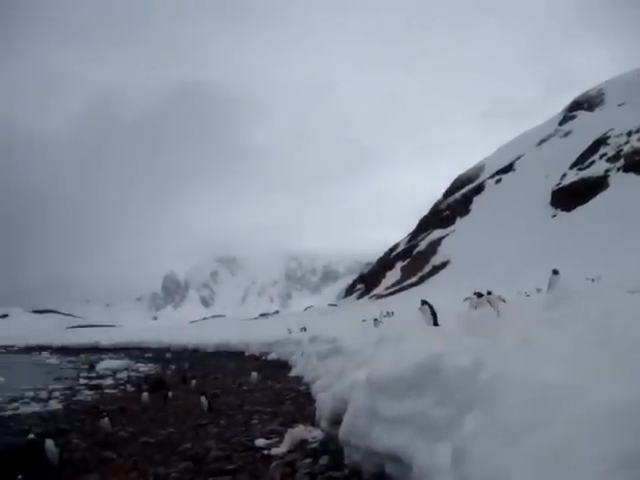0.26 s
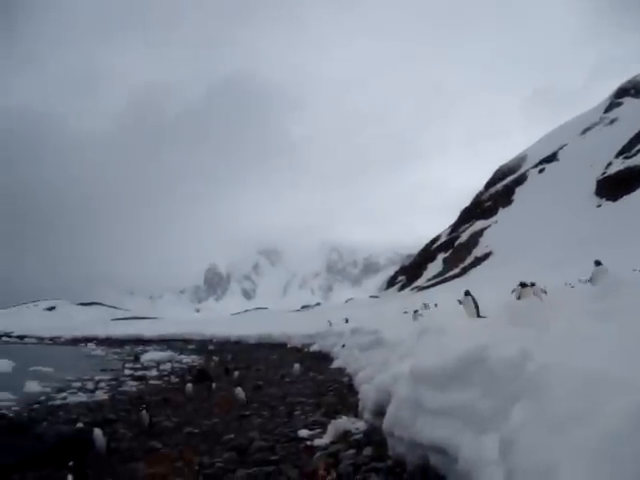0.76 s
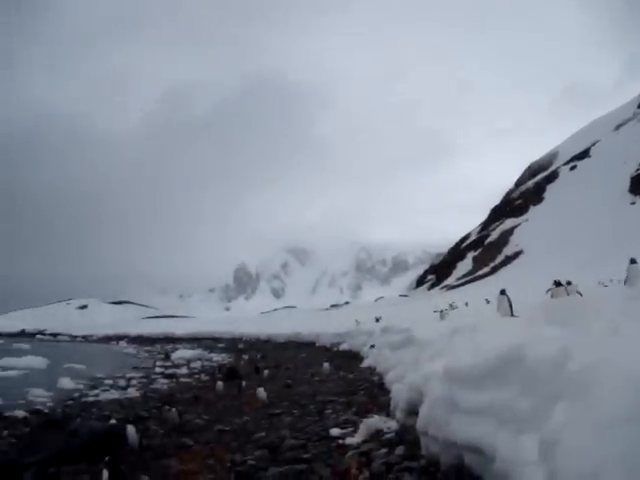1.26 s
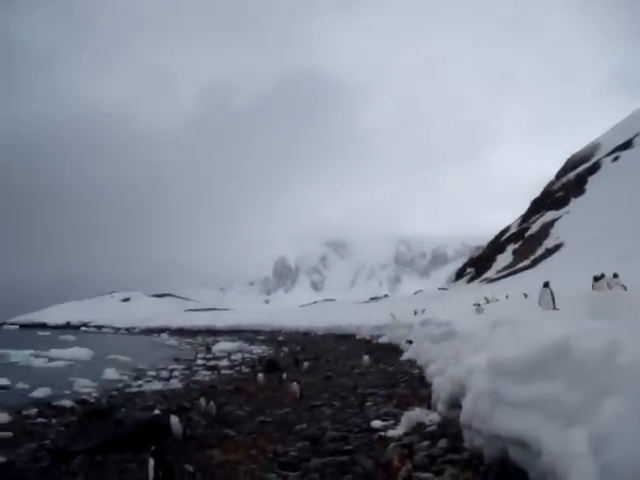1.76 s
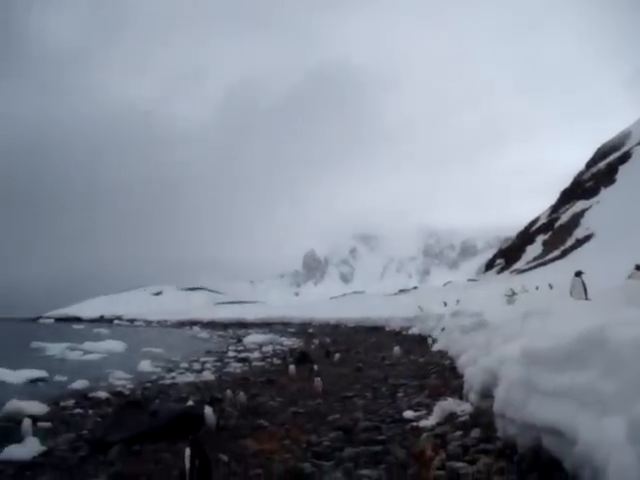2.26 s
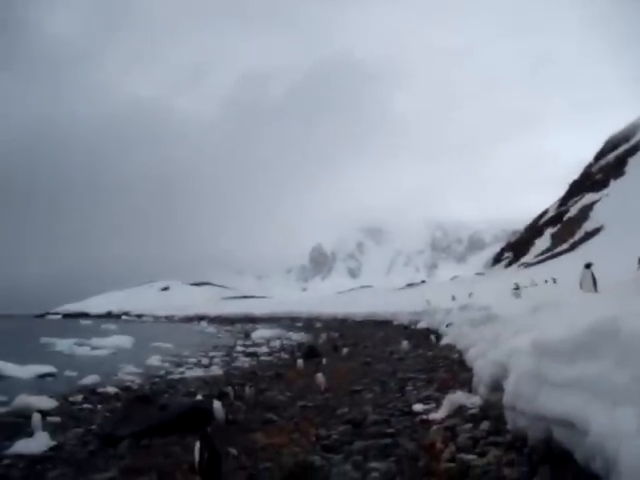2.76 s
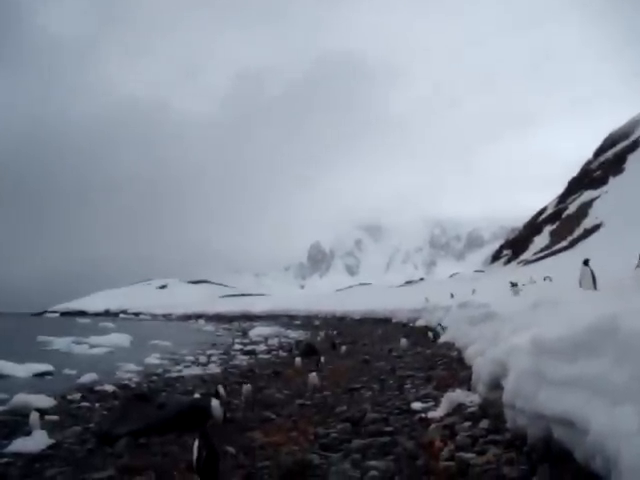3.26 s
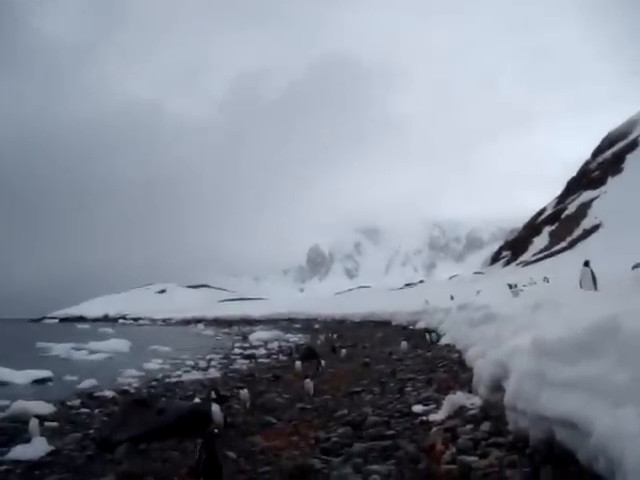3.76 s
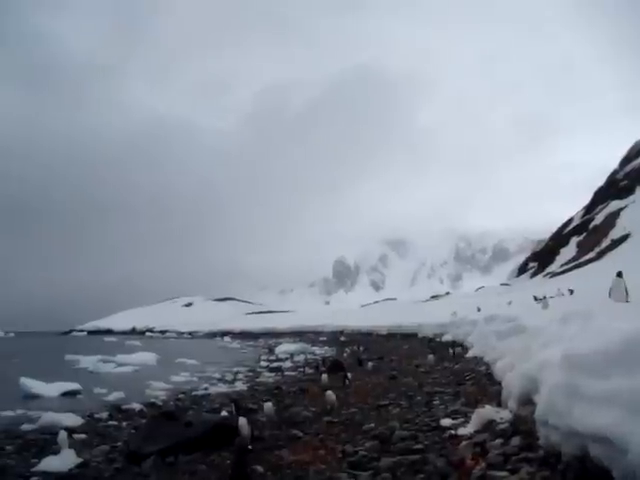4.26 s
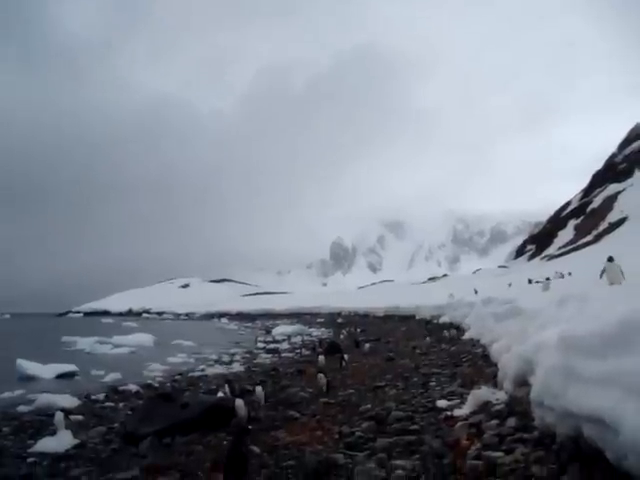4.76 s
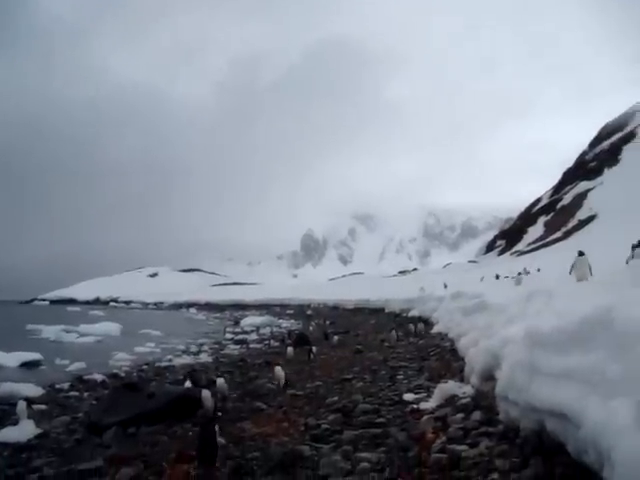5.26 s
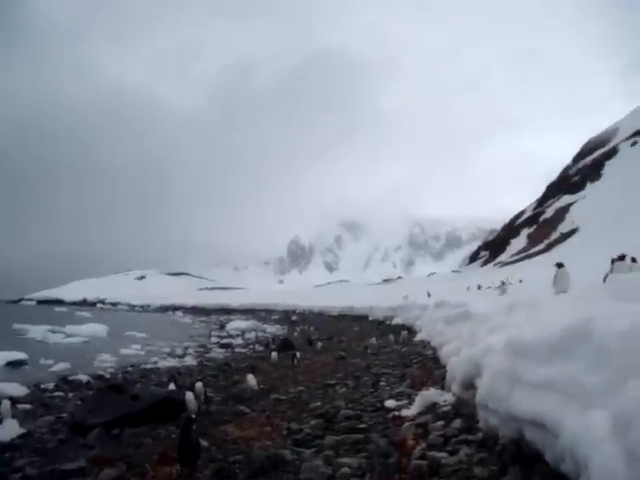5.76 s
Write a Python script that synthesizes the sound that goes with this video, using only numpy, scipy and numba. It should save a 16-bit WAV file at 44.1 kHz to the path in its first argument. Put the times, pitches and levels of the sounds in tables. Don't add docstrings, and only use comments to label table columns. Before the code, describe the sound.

On a windy pebble shore, far buzzy penguin brays and clear gasps give way to a slapping wavelet, then one loud close bray.

```python
import sys
import numpy as np
from scipy import signal
from scipy.io import wavfile
from scipy.ndimage import uniform_filter1d
from numba import njit

SR = 44100
rng = np.random.default_rng(int(sys.argv[2]) if len(sys.argv) > 2 else 0)


def unload_wav(signal):
    wavfile.write(
        sys.argv[1],
        SR,
        np.round(np.clip(np.atleast_2d(signal).T, -1, 1) * 32767).astype(np.int16),
    )


def natural_amplitude(level_db):
    exponent = np.asarray(level_db, float) / 20
    return 10 ** exponent


N = 264415
T = np.arange(N) / SR


def unit(x):
    return x / np.sqrt(np.mean(x ** 2) + 1e-30)


@njit
def svf(x, hz, width):
    y, b, l = np.empty(len(x)), 0., 0.
    g, k = np.tan(np.pi * hz / SR), width / hz
    for i in range(len(x)):
        v = (b + g * (x[i] - l)) / (1 + g * (g + k))
        b, l, y[i] = 2 * v - b, l + 2 * g * v, k * v
    return y


def ring_twice(x, hz, width):
    return svf(svf(x, float(hz), float(width)), float(hz), float(width))


def walk(rate):
    hold = int(SR / rate)
    steps = np.repeat(rng.standard_normal(N // hold + 1), hold)
    return unit(uniform_filter1d(uniform_filter1d(steps, hold), hold)[:N])


def fade(t0, t1, edge):
    return np.clip(np.minimum(T - t0, t1 - T) / edge, 0, 1)


def water(colour, tilt_db, swell_db, flicker_db, per_s, grain_db, spread_db):
    hz, db = np.transpose(colour)
    out, swell, shared = 0, swell_db * walk(20), 0
    for f in 25 * 2 ** (np.arange(27) / 3):
        shared = 0.87 * shared + 0.25 * flicker_db * walk(18)
        drop_size = natural_amplitude(spread_db * np.minimum(rng.exponential(size=N), 3))
        drops = (rng.random(N) < per_s / SR) * drop_size * rng.choice([-1, 1], N)
        mix = rng.standard_normal(N) + natural_amplitude(grain_db) * min(f / 2000, 1) * unit(drops)
        wobble = swell * min(f / 1000, 1) + shared
        wobble = wobble - uniform_filter1d(wobble, size=SR // 5)
        band = unit(ring_twice(mix, f, f / 3)) * np.sqrt(f)
        out = out + band * natural_amplitude(np.interp(np.log(f), np.log(hz), db) + tilt_db(f) + wobble)
    return out


# pitch in Hz, level in dB per Hz.
SHORE_COLOUR = [(15, -61), (25, -29.5), (250, -6.5), (363, -11.5), (646, -2.5), (1090, -3), (1240, -2.5),
                (1470, -4.5), (1990, -4), (2550, -9.5), (9860, -19.5), (12800, -7.5), (21700, -120)]
# time in seconds, level in dB.
SHORE_LEVEL = [(0, -40.5), (.5, -38), (1.5, -39.5), (2.3, -38), (6.0, -37)]


def shore():
    rush = water(SHORE_COLOUR, lambda f: 0, swell_db=1.1, flicker_db=1.1, per_s=250, grain_db=-7,
                 spread_db=2.5)
    return unit(rush) * natural_amplitude(np.interp(T, *np.transpose(SHORE_LEVEL)))


def knocks(rows):
    out, t = np.zeros(2 * N), T[:SR // 2]
    for start_s, db, hz, width_hz, t60_s, rise_s in rows:
        shape = (1 - np.exp(-t / rise_s)) * np.exp(-np.log(1000) * t / t60_s)
        tap = np.arange(len(t)) == int(rise_s * SR)
        contact = shape * (rng.standard_normal(len(t)) + 4 * tap)
        burst = ring_twice(contact, hz, 1.9 * width_hz)
        first = int(start_s * SR)
        out[first:first + len(t)] += natural_amplitude(db) * burst / np.abs(burst).max()
    return out[:N]


# start in seconds, peak level in dB, centre pitch in Hz, width in Hz,
# time to die away by 60 dB in seconds.
CLICKS = [
    (.5442, -21.5, 2300, 1700, .02),
    (.589, -29, 4600, 1500, .012),
    (1.553, -31, 3200, 900, .015),
    (.6915, -22, 2580, 200, .09),
    (.692, -20, 3350, 750, .075),
    (.692, -29, 4600, 1500, .04),
    (2.2608, -21, 780, 300, .04),
    (2.3426, -14, 3300, 3500, .004),
    (2.3426, -25, 7000, 4000, .003),
]
BUMPS = [(.15, -37, 240, 60, .2), (.815, -33, 1180, 100, 0.089), (1.0, -28.5, 1900, 900, .09),
         (1.52, -35.5, 750, 300, 0.027), (1.73, -31, 1500, 900, 0.073), (1.905, -31, 1800, 600, .09),
         (0.016, -30.5, 1180, 500, 0.06), (.89, -25, 5450, 4970, 0.0098), (1.17, -43, 70, 40, 0.18),
         (1.18, -35, 280, 150, 0.124), (1.476, -30.5, 1850, 120, 0.062), (2.298, -23, 925, 700, .1),
         (2.382, -33, 305, 150, 0.28), (2.318, -21.5, 1130, 920, 0.029), (2.925, -31, 2580, 400, 0.044),
         (3.41, -34, 330, 60, 0.16), (2.305, -29.5, 6000, 3000, .06), (4.32, -31.5, 387, 90, 0.2),
         (4.55, -30, 380, 90, .2), (4.692, -27.5, 313, 59.4, 0.076)]


def stones():
    clicks = [(*k, 1 / k[2]) for k in CLICKS]
    bumps = [(*k, 0.082 * k[4]) for k in BUMPS]
    return knocks(clicks + bumps)


@njit
def closures(hz, stretch, size):
    pulses, phase, p, k = np.zeros(len(hz) + 1), np.empty(len(hz)), 0., 0
    for i in range(len(hz)):
        step = hz[i] * stretch[k] / SR
        p += step
        if p >= 1:
            p, k = p - 1, k + 1
            pulses[i] += size[k] * p / step
            pulses[i + 1] += size[k] * (1 - p / step)
        phase[i] = p
    return pulses[:-1], phase


def beats(start, beat, slowing):
    k = np.arange(25)
    return start + beat * k + slowing * k ** 2 + .001 * rng.standard_normal(len(k))


def bray(curve, flutter, cycle, throat, jitter, shimmer_db, air_db, knee_hz, order, tone_db, under_db,
         lead, chest_db):
    s, hz, db = np.transpose(curve)
    rest_hz = np.interp(T, s, hz)
    age = T - s[0]
    turn = np.interp(T, flutter, np.arange(len(flutter))) % 1
    share, *columns = np.transpose(cycle)
    ratio, effort_db, tone_ratio, swing_db = (np.interp(turn, share, c) for c in columns)
    chance = rng.standard_normal((N // 50, 2)).T
    pulses, phase = closures(rest_hz * ratio, 1 + jitter * chance[0], natural_amplitude(shimmer_db * chance[1]))
    buzz = unit(pulses)
    air = unit(np.exp(-phase / 0.75) * rng.standard_normal(N))

    depth = np.clip(0.3985 + age / 0.35, 0, 1)
    tired_s = np.maximum(age - 0.58, 0)
    early_db = np.sqrt(depth) * np.interp((turn + lead) % 1, share, columns[1])
    mouth_hz, narrowest_hz, rasp_db = 2400, 115, 3
    voice = natural_amplitude(-13 + effort_db) * svf(buzz, 1900., 3500.)
    for f_hz, g_db in throat:
        mouth = knee_hz < f_hz < mouth_hz
        push_db = early_db if mouth else effort_db
        source = natural_amplitude(air_db + mouth * (rasp_db + push_db)) * air + buzz
        ring = svf(source, float(f_hz), float(np.clip(f_hz / 5.5, narrowest_hz, 350)))
        ring = svf(ring, float(f_hz), float(max(f_hz * min(f_hz / 2000, 1.5), narrowest_hz)))
        if 600 < f_hz < knee_hz:
            g_db = g_db + 0.97 * effort_db + (f_hz < 800) * 8 * np.exp(-np.abs(age) / .25)
        dull_db = (f_hz > mouth_hz) * -12.5 * tired_s
        mottle_db = .9 * walk(60)
        bright_db = push_db * np.clip((f_hz - knee_hz) / 1100, 0, 1.2)
        voice = voice + natural_amplitude(g_db + dull_db + mottle_db + bright_db) * ring
    voice = signal.sosfiltfilt(signal.butter(4, 5200, fs=SR, output="sos"), -voice)

    angle = 2 * np.pi * np.cumsum(rest_hz * tone_ratio ** depth * (1 + 0.005 * walk(60))) / SR
    tone = np.sin(order * angle) + natural_amplitude(under_db) * np.sin((order - 1) * angle)
    swing_db = swing_db * depth - 19 * tired_s * (.3 + 1.7 * turn)
    tone = fade(s[0] + .06, 9, .03) * tone * natural_amplitude(tone_db + swing_db + 1.5 * walk(50))

    chest_hz = rest_hz * 1.035 * ratio ** .12 * .993
    chest = natural_amplitude(chest_db + 1.5 * walk(40)) * np.sin(2 * np.pi * np.cumsum(chest_hz) / SR)
    voice = unit(voice) + chest + tone
    return voice * natural_amplitude(np.interp(T, s, db)) * fade(s[0], s[-1] + 0.019, 0.011)


def far_breath(s, length, db, hz):
    attack_s, release_s, edge_db, sag_hz = 0.0897, 0.093, -15.5, 4.94
    return [(s, hz, db + edge_db),
            (s + attack_s, hz, db),
            (s + length - release_s, hz - sag_hz, db - 4),
            (s + length, hz - sag_hz - 9.4, db + edge_db)]


# start in seconds, length in seconds, level in dB, resting pitch in Hz, # time between
# flutters in seconds.
FAR_BRAYS = [
    (0.071, 0.44, -35, 250.3, 0.043),
    (.871, 0.52, -36.5, 248.3, 0.0466),
    (1.681, .47, -35, 247.1, .047),
]
# pitch in Hz, level in dB.
FAR_THROAT = [(240, -6), (800, -23), (1330, 2), (1710, 5), (2090, 1.5), (2700, -5), (3400, -8),
              (4300, -6.5)]
# share of the cycle, pitch ratio, effort in dB,
# windpipe tone ratio, windpipe tone level in dB.
FAR_CYCLE = [(0, 1.39, 0, 1, -6), (.22, 1.33, -1, 1, -3), (.36, 1.02, -10, 1, 0), (.62, .99, -14, 1, 0),
             (.74, 1.4, -2, 1, -6), (1, 1.39, 0, 1, -6)]


def far_brays():
    out = 0
    for s, length, db, hz, beat in FAR_BRAYS:
        out = out + bray(far_breath(s, length, db, hz), beats(s, beat, 0.0001964), FAR_CYCLE, FAR_THROAT,
                         jitter=.018, shimmer_db=2.0, air_db=-14, knee_hz=250, order=1, tone_db=-13,
                         under_db=-60, lead=0, chest_db=-60)
    return out


def gasp_breath(s, length, db, hz, arch_hz):
    attack_s, release_s, edge_db, sag_hz = 0.014, 0.016, -22, 15
    return [(s, hz, db + edge_db),
            (s + attack_s, hz, db),
            (s + 0.58 * length, hz + arch_hz, db),
            (s + length - release_s, hz - sag_hz, db),
            (s + length, hz - sag_hz, db + edge_db)]


def gasp(curve, partials):
    s, hz, db = np.transpose(curve)
    phase = np.pi * np.cumsum(np.interp(T, s, hz) * (1 + 0.0026 * walk(87))) / SR
    tone = 0
    for k, g_db in partials:
        level = natural_amplitude(g_db + .3 * abs(k - 2) * walk(30))
        late_s = .014 * max(k - 3, 0)
        tone = tone + level * np.sin(k * phase + k * k) * fade(s[0] + late_s, 9, .02)
    tone = np.sqrt(2) * tone * natural_amplitude(np.interp(T, s, db)) * fade(s[0], s[-1], 0.013)
    return tone + natural_amplitude(-21) * np.roll(tone, int(.045 * SR))


# start in seconds, length in seconds, level in dB,
# pitch of the second partial in Hz, rise of the arch in Hz.
GASPS = [
    (0.638, 0.163, -37, 1246, 36.4),
    (1.466, 0.143, -38, 1233, 6.9),
]
# multiple of the base pitch, level in dB.
GASP_PARTIALS = [
    [(1, -15), (2, 0), (3, -11), (4, -10), (5, -15)],
    [(1, -17), (2, 1), (3, -16), (4, -19), (5, -18)],
]


def gasps():
    return sum(gasp(gasp_breath(*row), partials) for row, partials in zip(GASPS, GASP_PARTIALS))


# time in seconds, level in dB.
SPRAY = [(2.4, -56), (2.8, -59), (2.95, -51.5), (3.05, -46), (3.15, -43), (3.23, -38.5), (3.38, -37),
         (3.5, -35), (3.66, -35.5), (3.8, -36.5), (4.2, -40.5), (4.5, -39), (4.8, -42.5), (5.4, -41.5),
         (6.0, -47)]
# pitch in Hz, level in dB per Hz.
WAVE_COLOUR = [(35, -60), (60, -49.5), (78, -39.5), (216, -17.5), (317, -3), (401, -5), (497, -16.5),
               (829, -9), (1240, -3), (1540, -4), (3110, -8.5), (9860, -20), (12800, 5), (21700, -120)]


def wave():
    break_s = 2.885
    spray_db = np.interp(T, *np.transpose(SPRAY))
    body_db = -3 + 1.5 * (T - break_s)
    gurgle_db = -5 + 15.5 * np.clip((break_s - T) / 0.13, 0, 1)

    def tilt(f):
        low, high = np.clip(np.log2([700 / f, f / 2500]), 0, 1)
        return low * gurgle_db + (1 - low - high) * body_db

    rush = water(WAVE_COLOUR, tilt, swell_db=.8, flicker_db=1.2, per_s=400, grain_db=-4, spread_db=2.8)
    return rush * natural_amplitude(spray_db - 25.5) * fade(SPRAY[0][0], 7, 0.092)


# start in seconds, peak level in dB, centre pitch in Hz.
SLAPS = [(3.1276, -19, 2050), (3.21, -20, 1500), (3.262, -18.5, 1400), (3.374, -14.5, 1700),
         (3.878, -16.5, 1800), (4.067, -19.5, 1500), (4.24, -18, 2500), (4.41, -21, 1800),
         (4.625, -18.5, 1700), (4.82, -22, 1700), (3.46, -18.5, 3000), (3.6, -16, 2620),
         (3.3003, -17.5, 3190), (3.4094, -18, 1280), (3.4906, -12, 1480), (3.5602, -17, 1680),
         (3.6496, -13.5, 1950), (3.807, -16.5, 1340), (3.9697, -14.5, 1560), (4.295, -14, 1850),
         (4.3474, -23, 1460), (4.5192, -19, 1990), (4.5796, -17, 1460), (4.6594, -19, 2510),
         (4.8663, -26.5, 2040), (5.0442, -22, 1460)]


def slaps():
    t60_s = .05
    return knocks([(s, db - 4.5, hz, 0.51 * hz, t60_s, 0.082 * t60_s) for s, db, hz in SLAPS])


def near_breath(start_s):
    age = T[:SR:441]
    db = -19 - 21.5 * np.exp(-age / 0.083)
    db = db - 1.5 * np.exp(-((start_s + age - 6.08) / 0.26) ** 2)
    hz = 297.1 - 19 * np.exp(-(age / .33) ** 2) - 8 * age * age
    return np.transpose([start_s + age, hz, db])


# pitch in Hz, level in dB.
NEAR_THROAT = [(355, -18), (775, -15.5), (890, -8.5), (1040, 0), (1450, -2.5), (1740, 0.5), (1900, -5.5),
               (2060, -1), (2650, -5), (3180, -6), (3750, -11), (4500, -10)]
# share of the cycle, pitch ratio, effort in dB,
# windpipe tone ratio, windpipe tone level in dB.
NEAR_CYCLE = [(0, 1.28, 4, .885, -9), (.08, 1.25, 3.5, .925, -2), (.17, 1.1, 2.5, .985, 0),
              (.3, 1.005, 1, 1.0, 0), (.56, .995, -2.5, 1.004, -.5), (.7, 1.04, -4, 1.008, -2),
              (.82, 1.13, -4.5, 1.03, -5), (.93, 1.25, 0, 1.09, -10), (1, 1.28, 4, 1.13, -13)]


def near_bray():
    start_s = 5.13
    return bray(near_breath(start_s), beats(start_s + .002, .0398, .00008), NEAR_CYCLE, NEAR_THROAT,
                jitter=.015, shimmer_db=1.8, air_db=-18, knee_hz=1150, order=4, tone_db=-.7,
                under_db=-17, lead=.24, chest_db=-21)


def snow_bank(birds):
    t = T[:SR // 5]
    decay = np.exp(-np.log(1000) * t / .25) * (t > .004)
    bank = unit(rng.standard_normal(len(t)) * decay) / np.sqrt(len(t))
    return natural_amplitude(-16) * signal.fftconvolve(birds, bank)[:N]


def scene():
    birds = far_brays() + gasps() + near_bray()
    birds = birds + snow_bank(birds)
    return (shore() + stones() + birds + wave() + slaps())[None]


def patchy_treble(x):
    hz, _, z = signal.stft(x, SR, nperseg=256)
    band = (np.log2(hz + 1) // .16).astype(int)
    moment = np.arange(z.shape[-1]) // 3
    luck = rng.random((100, moment[-1] + 1)) * rng.random(moment[-1] + 1) ** .5
    treble = uniform_filter1d(np.abs(z[0, hz > 6000]).mean(0), size=40)
    luck = luck * (.6 + treble / np.median(treble))[::3]
    lost = luck[band][:, moment] < .16 * np.clip(hz / 3500 - 1, 0, 1)[:, None]
    return signal.istft(np.where(lost, .05 * z, z), SR, nperseg=256)[1][..., :N]


def roll_off(x):
    return signal.sosfilt(signal.butter(12, 10010, fs=SR, output="sos"), x)


def record(dry):
    thin = signal.sosfilt(signal.butter(1, 75, "high", fs=SR, output="sos"), dry)
    top_cut = signal.ellip(12, .2, 105, 10080, fs=SR, output="sos")
    mix = signal.sosfilt(top_cut, patchy_treble(thin))
    return roll_off(mix)


dry = scene()
out = record(dry)
unload_wav(out)
```